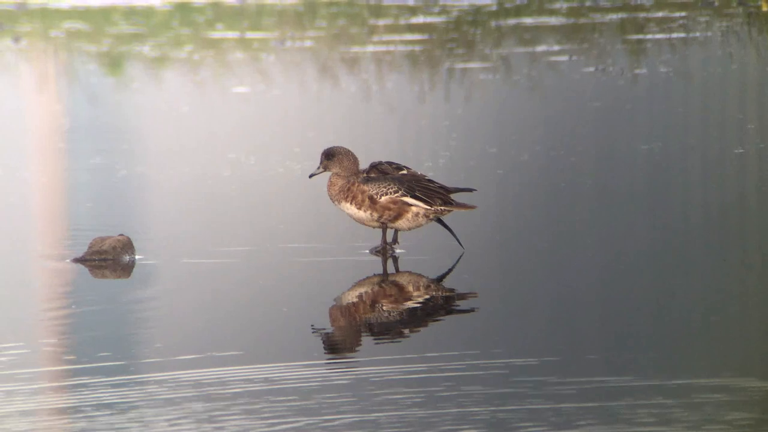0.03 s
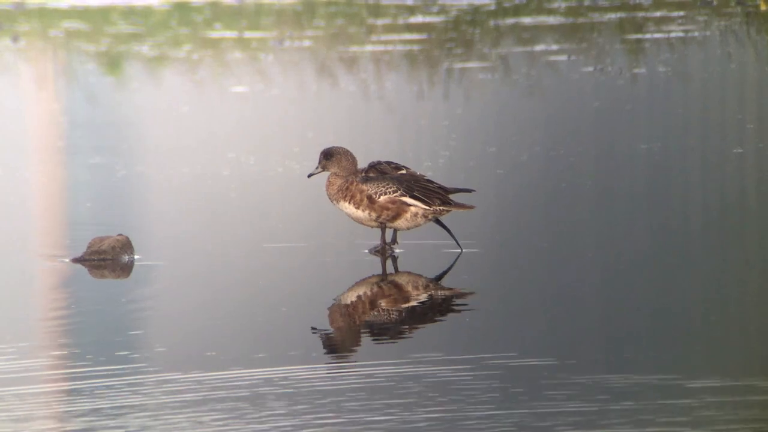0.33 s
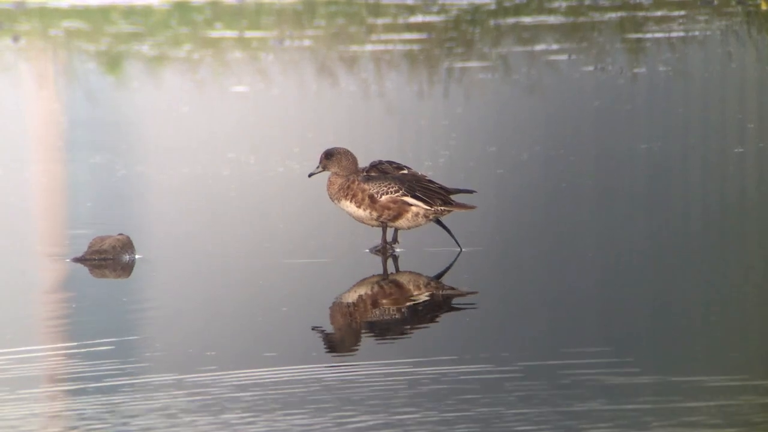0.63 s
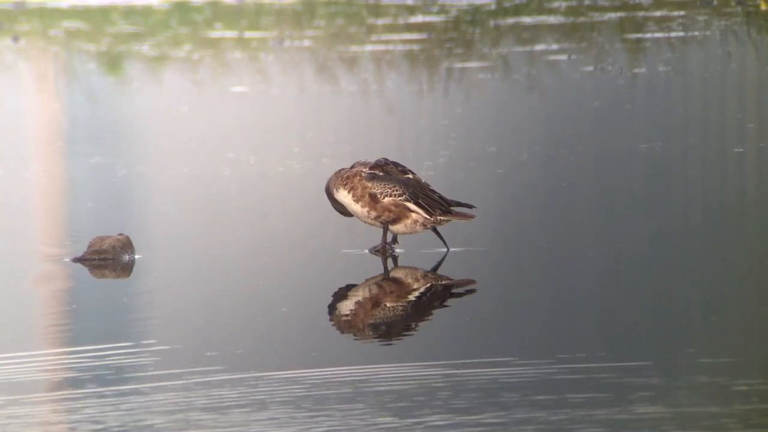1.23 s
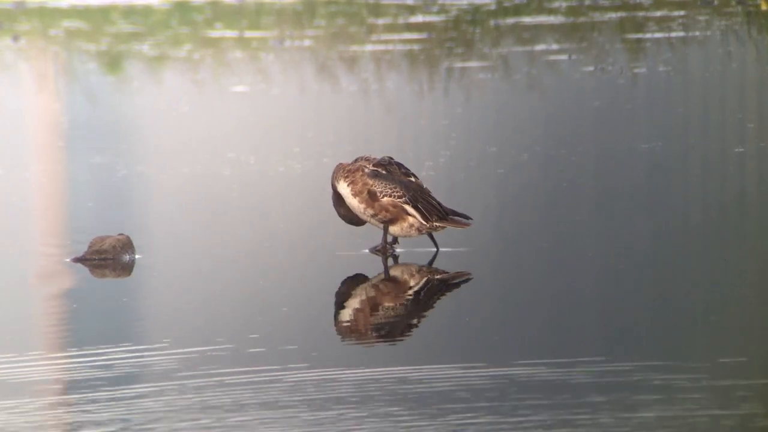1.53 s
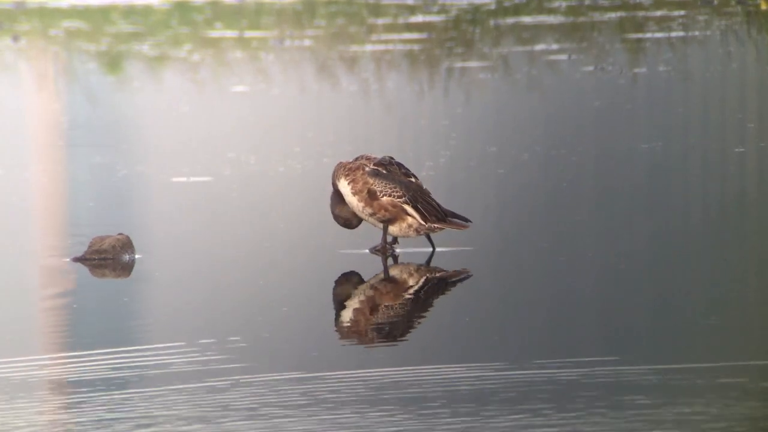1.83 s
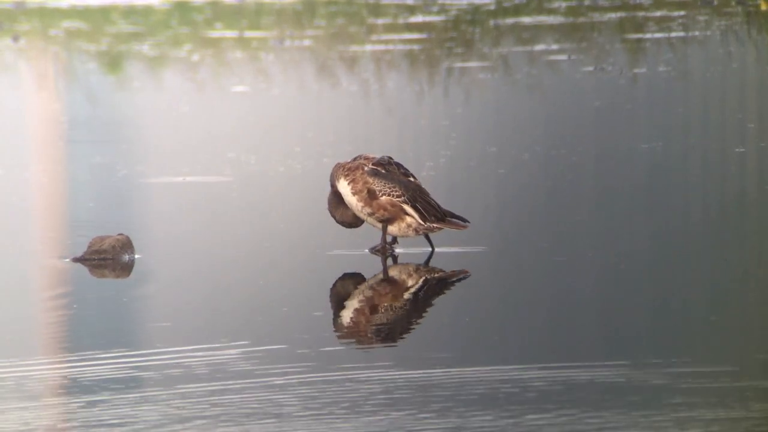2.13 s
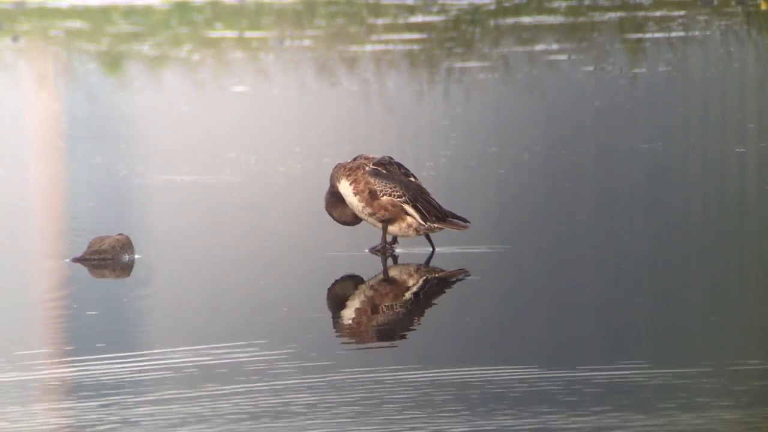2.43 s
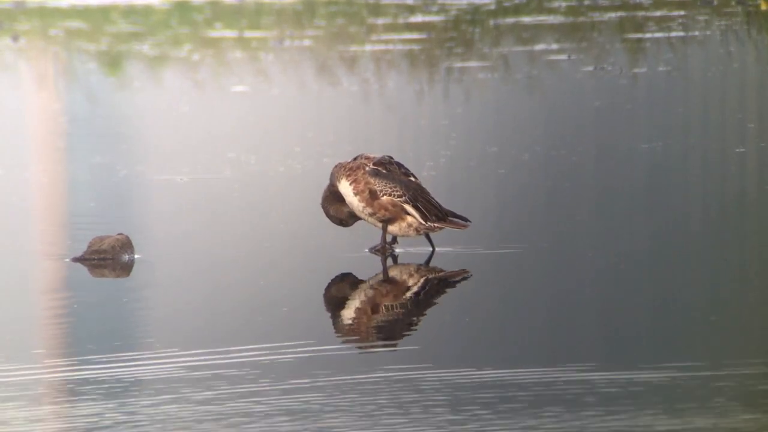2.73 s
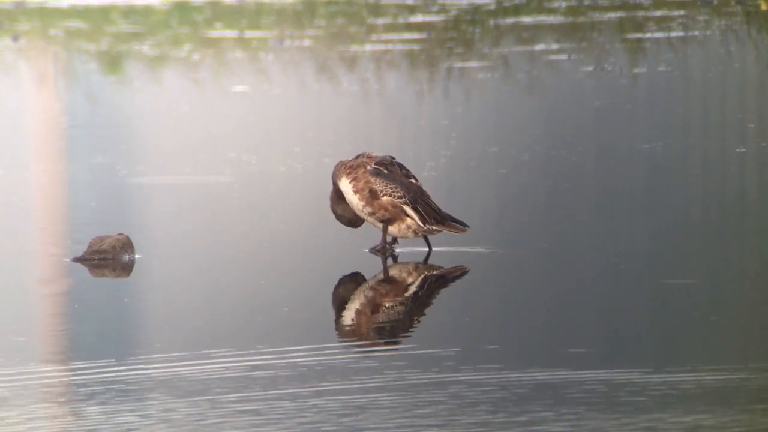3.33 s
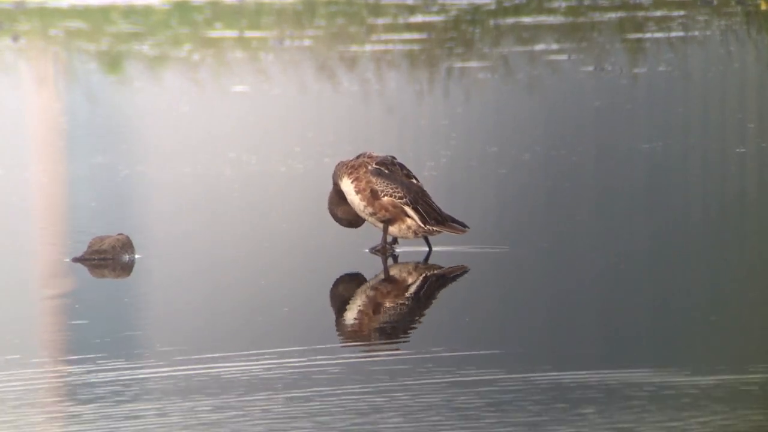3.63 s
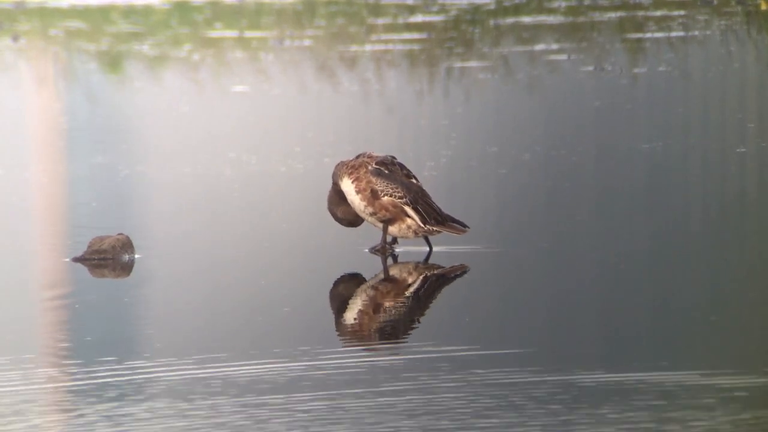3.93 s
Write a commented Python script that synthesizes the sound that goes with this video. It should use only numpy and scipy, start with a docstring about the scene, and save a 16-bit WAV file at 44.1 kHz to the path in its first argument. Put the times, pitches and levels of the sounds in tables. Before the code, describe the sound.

A low, steady rumble of far-off engines and tyres carries over an open pond, under faint bird whistles and twittering. Midway one vehicle briefly grows louder, and a soft nearby rustle with a thin squeak comes at the end.

```python
"""A quiet pond in the open air. After a moment of silence come a faint hiss, a brief high sizzle and
distant traffic: engines rumble and tyres make a dull rush. From then on a far songbird whistles
slurred notes and short trills, blurred by echoes from the banks, over twittering from farther off.
Just past halfway one vehicle swells up and dies away.
Near the end something close by rubs lightly, with a thin squeak."""
import sys
import numpy as np
from scipy import signal
from scipy.fft import rfft, irfft
from scipy.io import wavfile

SR = 44100
rng = np.random.default_rng(int(sys.argv[2]) if len(sys.argv) > 2 else 0)


def to_wav(sig):
    """Store sig (one row per channel, or 1-D mono) as 16-bit WAV at the path in sys.argv[1].

    Samples outside -1..1 are clipped; the rate is SR.
    """
    pcm = np.clip(np.atleast_2d(sig), -1, 1) * 32767
    pcm = np.round(pcm).astype(np.int16)
    wavfile.write(sys.argv[1], SR, pcm.T)  # frames by channels


N = 176400


def undb(db):
    """Turn decibels into a number to multiply a sound by."""
    return 10 ** (np.asarray(db) / 20)


def unit(x):
    """Scale a signal to an average strength (rms) of 1."""
    return x / np.sqrt(np.mean(x ** 2))


def level_curve(t, points):
    """Gain that glides through (time [s], level [dB]) points."""
    return undb(np.interp(t, *np.transpose(points)))


def noise(points):
    """Noise of strength 1, its tone shaped by (frequency [Hz], level [dB]) points."""
    hz, db = np.array(points, float).T
    f = np.maximum(np.fft.rfftfreq(N, 1 / SR), 1)
    gain = undb(np.interp(np.log(f), np.log(hz), db))
    fade_outside = np.minimum(f / hz[0], 1) ** 2 * np.minimum(hz[-1] / f, 1) ** 2
    return unit(irfft(rfft(rng.standard_normal(N)) * gain * fade_outside, N))


def ring(hz, width_hz, order=1):
    """Noise of strength 1 that rings around one pitch; a higher order keeps it closer."""
    x = rng.standard_normal(N)
    for _ in range(order):
        x = signal.lfilter(*signal.iirpeak(hz, hz / width_hz, fs=SR), x)
    return unit(x)


def wander(rate):
    """A smooth random wobble of strength 1 that changes about rate times a second."""
    f = np.fft.rfftfreq(N, 1 / SR)
    slow_only = np.exp(-(f / rate) ** 2) * (f > 0)
    return unit(irfft(rfft(rng.standard_normal(N)) * slow_only, N))


def patchy(x, depth_db=1.5):
    """Let 14 neighbouring bands of a low sound grow louder and softer on their own."""
    f, spectrum = np.fft.rfftfreq(N, 1 / SR), rfft(x)
    centres_hz = np.linspace(100, 1300, 14)
    bands = [irfft(spectrum * np.interp(f, centres_hz, pick), N) for pick in np.eye(14)]
    return unit(sum(band * undb(depth_db * wander(9)) for band in bands))


# Tone of the hiss (frequency [Hz], relative level [dB])
HISS_TONE = [(800, 2), (1500, 7.5), (2200, 3), (3200, 2), (4500, -4), (5200, -1.5), (6500, -1.5),
             (6900, 0.5), (7500, -4.5), (9500, -3), (10400, -8), (11500, -4.5), (12600, -7), (13100, -3.5),
             (13700, -5), (15500, -8)]
def hiss(t):
    """A faint steady hiss, with a thin high sizzle at the start."""
    sizzle = ring(hz=13200, width_hz=300) * np.exp(-((t - .18) / .14) ** 2)
    return noise(HISS_TONE) * undb(-76) + sizzle * undb(-84)


# Tone of the engine rumble (frequency [Hz], relative level [dB])
ENGINE_TONE = [(20, -27.5), (30, -17.5), (42, -18), (58, 3), (85, 1), (130, -1.5), (185, -2.5), (240, -6.5),
               (315, -7), (400, -13), (500, -19), (700, -30), (1300, -52.5)]
# How the rumble rises and falls (time [s], relative level [dB])
ENGINE_FLOW = [(.1, 0), (.5, -.3), (.9, -1), (1.3, -0.5), (1.7, 0), (2.1, -.5), (2.8, -0.5), (3.2, -0.5),
               (3.6, .5), (4.0, 0)]
def engines(t):
    """Distant engines rumble and drone, following the flow of traffic."""
    rumble = noise(ENGINE_TONE) * undb(-50.5)
    drone = ring(hz=177.7, width_hz=36, order=2) * undb(-61)
    return (rumble + drone) * level_curve(t, ENGINE_FLOW)


# Tone of the tyre rush (frequency [Hz], relative level [dB])
TYRE_TONE = [(350, -29), (520, -7), (640, 2.5), (740, 0.5), (900, 2), (1050, 0.5), (1160, -6.5),
             (1250, -18), (1380, -25), (1800, -37.5), (3000, -46.5)]
# How the rush rises and falls (time [s], relative level [dB])
TYRE_LEVELS = [(.1, 2.5), (.4, 0), (.8, 0.5), (1.3, 0.6), (1.7, 0.6), (2.2, 2.25), (2.8, -1), (3.2, -0.3),
               (3.6, 0.4), (3.9, 2.5)]
def tyres(t):
    """Far tyres roll along with a dull, uneven rush."""
    return patchy(noise(TYRE_TONE)) * undb(-59.5) * level_curve(t, TYRE_LEVELS)


# Tone of one louder vehicle (frequency [Hz], relative level [dB])
VEHICLE_TONE = [(70, -27), (130, -3.5), (200, 5), (320, -3.5), (420, -5.5), (520, -24), (700, -17),
                (1100, -21), (1350, -58.5)]
def vehicle(t, peak_s=2.272, rise_s=.09, fall_s=.57):
    """One vehicle swells quickly and dies away slowly."""
    age = t - peak_s
    swell = np.where(age < 0, np.exp(-(age / rise_s) ** 2), np.exp(-np.abs(age) / fall_s))
    return noise(VEHICLE_TONE) * undb(-48.5) * swell


# Tone of the twittering (frequency [Hz], relative level [dB])
TWITTER_TONE = [(3000, -22), (3500, -5), (3850, -4.5), (4400, -4), (4900, -9.5), (5500, -29)]
# How loud the twittering is (time [s], level [dB])
TWITTER_LEVELS = [(.1, -81), (.2, -82), (.55, -85), (.75, -85), (1.0, -90), (1.25, -88.5), (1.8, -85.5),
                  (2.2, -85), (2.6, -90), (3.1, -87), (3.5, -88), (3.75, -87), (4.0, -87)]
def twittering(t):
    """Twittering from farther off blends into a soft, high band of noise."""
    return noise(TWITTER_TONE) * level_curve(t, TWITTER_LEVELS)


# Tone of the rustle (frequency [Hz], relative level [dB])
RUSTLE_TONE = [(900, -6), (1700, 4), (2600, -5), (4000, -12), (5500, -14), (6900, -6), (8000, -25),
               (13000, -16), (15500, -25)]
# Light rubs (time [s], half length [s], rustle level [dB], squeak level [dB])
RUB_STROKES = [(3.748, 0.024, -70.5, -81), (3.747, 0.0098, -86, -71), (3.864, 0.061, -83.5, -86),
               (3.968, 0.025, -90, -79)]
def rubbing(t):
    """Something rubs close by: each stroke is a soft rustle with a thin, rough squeak."""
    rustle, squeak = noise(RUSTLE_TONE), ring(hz=9400, width_hz=350, order=2)
    out = np.zeros(N)
    for time, half_length, rustle_db, squeak_db in RUB_STROKES:
        stroke = np.exp(-((t - time) / half_length) ** 2)
        out += stroke * (undb(rustle_db) * rustle + undb(squeak_db) * squeak)
    return out


def bank_echoes(x, t, fade_s=.38, echo_db=-9.5):
    """Add scattered echoes from banks and trees; they fall by 60 dB in fade_s."""
    tail = rng.standard_normal(N) * np.exp(-np.log(1000) * t / fade_s)
    echoes = signal.fftconvolve(x, tail / np.linalg.norm(tail))[:N]
    return x + undb(echo_db) * echoes


def add_whistle(out, waver, start, length, first_hz, middle_hz, last_hz, db):
    """Add one whistle to out: a pure tone that bends through three pitches."""
    progress = np.linspace(0, 1, max(int(length * SR), 8))
    samples = int(start * SR) + np.arange(len(progress))
    bend = np.polyfit([0, .5, 1], [first_hz, middle_hz, last_hz], 2)
    hz = np.polyval(bend, progress) * waver[samples % N]
    tone = np.sqrt(2) * np.sin(2 * np.pi * np.cumsum(hz) / SR)
    # Fading in and fading out each take 31% of the note.
    ramp = np.clip(np.minimum(progress, 1 - progress) / .31, 0, 1)
    whistle = undb(db) * np.sin(np.pi / 2 * ramp) * tone
    inside = samples < N
    out[samples[inside]] += whistle[inside]


# Slurred notes (start [s], length [s], first pitch [Hz], middle pitch [Hz], last pitch [Hz],
# relative level [dB])
BIRD_NOTES = [(0.225, 0.043, 3800, 4150, 3750, -81), (0.273, .034, 4050, 4000, 3550, -77),
              (.345, 0.03, 3650, 3780, 3970, -79), (0.379, 0.032, 4150, 3980, 3920, -69.5),
              (0.382, 0.064, 4500, 4540, 3840, -83), (0.495, 0.032, 3560, 3690, 3900, -76),
              (.48, 0.097, 4380, 4320, 4350, -80.5), (0.556, .035, 3700, 3650, 3520, -76),
              (0.647, 0.046, 4200, 4120, 3770, -78), (0.699, 0.025, 3650, 4030, 3600, -71.5),
              (0.728, 0.019, 3900, 3710, 3500, -69.5), (0.773, 0.088, 3700, 4570, 4250, -79.5),
              (.94, 0.031, 3780, 3820, 3620, -78), (0.992, .033, 3950, 3950, 3750, -80),
              (1.14, .02, 3750, 3640, 3600, -73), (1.548, 0.056, 3830, 3720, 3650, -70),
              (1.596, 0.051, 3720, 3680, 3640, -87), (1.895, 0.02, 3850, 3760, 3650, -74),
              (2.088, 0.055, 3950, 3710, 3620, -74.5), (2.149, 0.048, 3590, 3780, 4050, -73.5),
              (2.208, .028, 4170, 4170, 4020, -74.5), (2.212, .135, 4300, 4700, 4700, -85),
              (2.335, 0.057, 4450, 4120, 4070, -78), (2.366, 0.0565, 4100, 3933, 3870, -68.5),
              (2.428, 0.015, 3920, 3810, 3680, -68.5), (2.625, .04, 4550, 4540, 4300, -80.5),
              (2.968, .035, 4500, 4270, 3960, -79), (3.002, 0.042, 4050, 3970, 3970, -73),
              (3.163, .021, 4760, 4630, 4630, -72), (3.302, .014, 3900, 3700, 3500, -77),
              (3.311, .05, 4250, 4560, 4150, -80), (3.41, .02, 4450, 4330, 4200, -82),
              (3.434, 0.031, 4130, 4000, 3480, -71.5)]
# Trills (start [s], speed [notes/s], length [s], pitch [Hz], pitch fall [Hz/s], # relative level [dB], random
# pitch spread [fraction]); the very fast row at 2.989 s blurs into one raspy, falling note
BIRD_TRILLS = [(2.672, 31.5, .155, 4285, 350, -74, 0.0043), (2.989, 120, .095, 4050, 3800, -76, 0.021),
               (3.5, 70, .13, 3480, 503, -82, 0.023), (3.631, 62, .29, 3910, 100, -80.5, 0.011)]
def songbird():
    """A bird whistles slurred notes, one raspy note and uneven trills of little falling notes."""
    out = np.zeros(N)
    waver = 1 + .008 * wander(250)  # the pitch trembles slightly
    for note in BIRD_NOTES:
        add_whistle(out, waver, *note)
    for start, speed, length, hz, fall, db, spread in BIRD_TRILLS:
        note_s = .7 / speed  # leaves a gap after each note
        ages = np.arange(0, length, 1 / speed)
        for age, (extra_db, detune) in zip(ages, rng.standard_normal((64, 2))):
            pitch = (hz - fall * age) * (1 + spread * detune)
            add_whistle(out, waver, start + age, note_s, pitch, pitch, pitch * .95, db + extra_db)
    return out * undb(-.5)


def scene():
    """Mix hiss, traffic, twittering, rubs and the songbird into one channel."""
    t = np.arange(N) / SR
    twitter = twittering(t)
    flow = (engines(t) + tyres(t)) * undb(.4 * wander(14))  # the level wavers a little
    traffic = flow + vehicle(t)
    bird = bank_echoes(songbird(), t)
    rubs = rubbing(t)
    return (hiss(t) + traffic + twitter + rubs + bird)[None]


def record(dry, start_s=.084, top_hz=15350):
    """Let the sound in after a moment of silence and cut the highest treble."""
    fade_in = np.clip((np.arange(N) / SR - start_s) / .002, 0, 1)
    treble_cut = signal.ellip(10, .2, 70, top_hz, fs=SR, output="sos")
    return signal.sosfilt(treble_cut, dry * fade_in)


dry = scene()
out = record(dry)
to_wav(out)
```